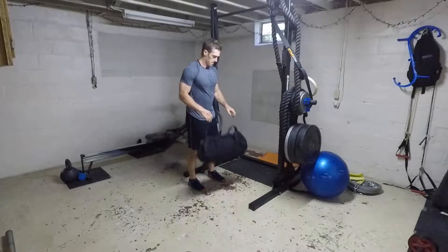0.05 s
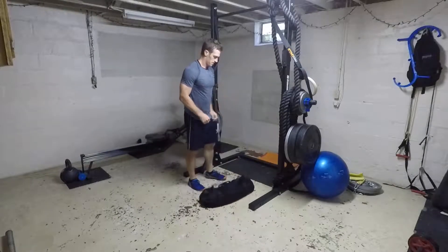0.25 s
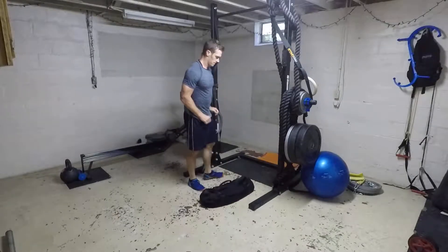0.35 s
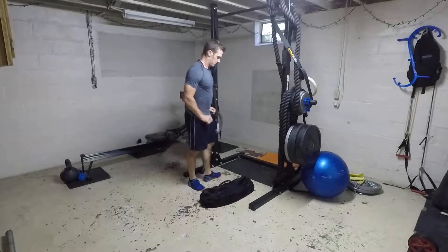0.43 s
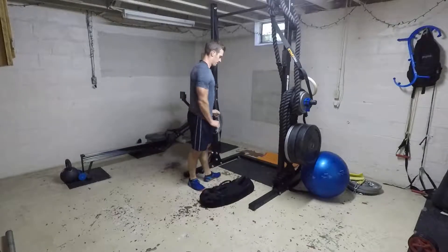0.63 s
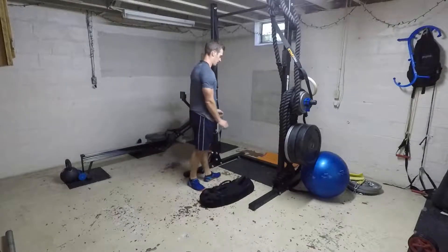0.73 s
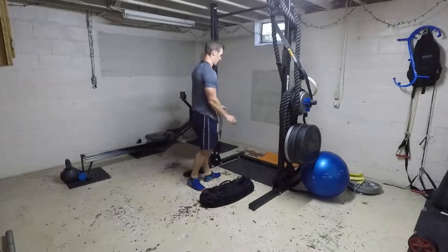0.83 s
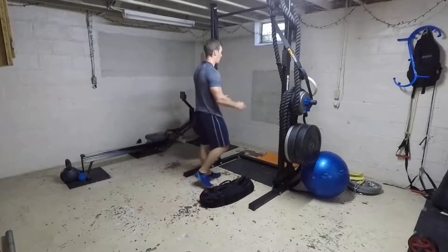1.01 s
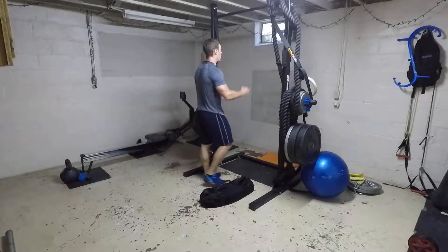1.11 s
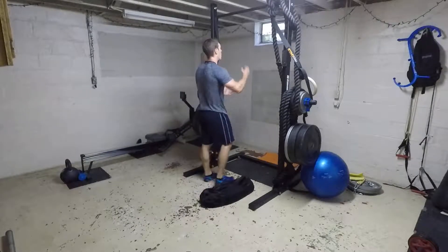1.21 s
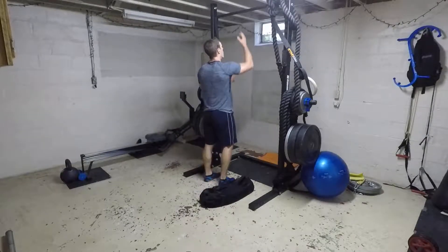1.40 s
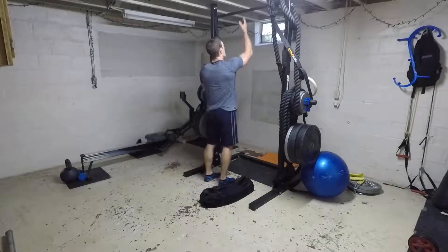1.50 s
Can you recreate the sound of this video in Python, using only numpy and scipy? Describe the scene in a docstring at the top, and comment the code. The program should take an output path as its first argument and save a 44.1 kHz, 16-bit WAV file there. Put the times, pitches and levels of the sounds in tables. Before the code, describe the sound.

A heavy sandbag lands on concrete with a thud and a cloth slap, just after its straps slide off the hands. The small basement booms briefly, sand crunches and buckles ring faintly, then feet shuffle quietly.

```python
"""A heavy thud and slap: a sandbag, slipping from the hands, hits a small basement's concrete floor.
The webbing hisses off the hands; the bulk lands, then the rest flops down more softly.
Each landing pushes out a wave of air and the room's low modes boom.
The cloth smacks flat, buckles ring faintly, sand crunches and trickles.
Then feet shuffle and a sleeve swishes over faint hiss and a soft, regular low pulsing."""
import sys
import numpy as np
from scipy import signal
from scipy.fft import rfft, irfft, next_fast_len
from scipy.io import wavfile
from scipy.ndimage import map_coordinates

SR = 44100
rng = np.random.default_rng(int(sys.argv[2]) if len(sys.argv) > 2 else 0)


def dump(signal):
    """Clip the signal to [-1, 1] and save it as 16-bit WAV at the path in sys.argv[1]."""
    limited = np.clip(np.atleast_2d(signal).T, -1, 1)
    pcm = np.round(limited * 32767).astype(np.int16)
    wavfile.write(sys.argv[1], SR, pcm)


N = 68355
TOUCH_S = 0.2055  # slack cloth meets the floor

# Bag landings, the bulk then the rest. Each row: start in seconds, air push in dB, slap in dB.
LANDINGS = [(0.2100, -2.5, -15), (0.2259, -8, -19)]
# Hiss of sand and sleeve. Each row: frequency in Hz, relative density in dB.
HISS_SPECTRUM = [(1500, -34), (3400, -23), (4300, -10), (5100, -6.5), (5800, 1.5), (6500, -5), (7400, -10),
                 (9200, -15), (11000, -30.5), (13000, -27), (15500, -41)]
# Rumble of body and feet. Each row: frequency in Hz, relative density in dB.
RUMBLE_SPECTRUM = [(25, -6), (70, 0), (120, -4), (200, -5), (235, -11), (285, -24), (400, -34), (800, -60),
                   (2000, -110)]


def amp(db):
    """dB to gain."""
    return 10 ** (np.asarray(db) / 20)


def unit(x):
    """Scale to rms 1."""
    return x / np.sqrt(np.mean(x ** 2) + 1e-20)


def time_s():
    """Time of each sample."""
    return np.arange(N) / SR


def interp_log_hz(points, hz):
    """Interpolate (Hz, value) points on a log frequency axis."""
    point_hz, values = np.transpose(points)
    return np.interp(np.log(hz + 1), np.log(point_hz + 1), values)


def envelope(points):
    """Gain per sample from (s, dB) points."""
    return amp(np.interp(time_s(), *np.transpose(points)))


def coloured(x, spectrum):
    """Minimum-phase filter with the given spectrum and unit power gain."""
    n_fft = 2 * next_fast_len(N)
    gain = unit(amp(interp_log_hz(spectrum, np.fft.rfftfreq(n_fft, 1 / SR))))
    cepstrum = irfft(np.log(np.maximum(gain, 1e-6)))
    cepstrum[1:n_fft // 2] *= 2
    cepstrum[n_fft // 2 + 1:] = 0
    return irfft(rfft(x, n_fft) * np.exp(rfft(cepstrum)))[:N]


def noise(spectrum):
    """Coloured noise, rms 1."""
    return unit(coloured(rng.standard_normal(N), spectrum))


def grains(per_s):
    """Random tiny impacts, rms 1."""
    return unit(rng.standard_normal(N) * (rng.random(N) < per_s / SR))


def burst(start_s, rise_s, t60_s):
    """Envelope with exponential rise and decay."""
    age_s = np.maximum(time_s() - start_s, 0)
    return (1 - np.exp(-age_s / rise_s)) * amp(-60 * age_s / t60_s)


def ring(modes, start_s, rise_s, drift_rad):
    """Damped modes with wandering phases."""
    t, out = time_s(), np.zeros(N)
    for hz, db, t60_s in modes:
        wander = map_coordinates(rng.standard_normal(100), [t * 50])
        phase = 2 * np.pi * hz * (t - start_s) + drift_rad * wander
        out += amp(db) * np.sin(phase) * burst(start_s, rise_s, t60_s)
    return out


def room(x, wet_db, build_s=0.009):
    """Direct sound plus dense reflections off bare block walls."""
    # Reverb decay. Each row: frequency in Hz, T60 in seconds.
    decay = [(100, 0.52), (450, 0.31), (1000, 0.42), (3000, 0.35), (6000, 0.34), (14000, 0.35)]
    hz, t, bands = signal.stft(rng.standard_normal(SR), SR, nperseg=256)
    t60_s = interp_log_hz(decay, hz)[:, None]
    tail = signal.istft(bands * amp(-60 * t / t60_s), SR, nperseg=256)[1]
    tail *= 1 - np.exp(-np.arange(len(tail)) / SR / build_s)
    return x + amp(wet_db) * signal.fftconvolve(x, tail / np.linalg.norm(tail))[:N]


def background():
    """Faint steady hiss; late on, soft low pulses at about ten a second."""
    # Hiss. Each row: frequency in Hz, relative density in dB.
    floor_spectrum = [(100, -8.5), (250, 4.5), (500, 2), (900, -5), (1500, -3.5), (2200, -8.5), (3300, -19),
                      (5000, -15.5), (7500, -20.5), (9800, -18.5), (12000, -26.5), (15000, -32)]
    # Low pulses. Each row: time in seconds, gain in dB.
    pulses = [(0.9747, -29.5), (1.08, -35), (1.18, -27.5), (1.2833, -25.5), (1.385, -26.5), (1.489, -26)]
    width_s = 0.0026
    out = amp(-52) * noise(floor_spectrum)
    for at_s, db in pulses:
        widths = (time_s() - at_s) / width_s
        crest = np.exp(-(widths + 0.5) ** 2)
        trough = 0.78 * np.exp(-((widths - 2.3) / 2.34) ** 2)
        out += amp(db) * (crest - trough)
    return out


def movement():
    """After the drop feet tread and shuffle, a sole scuffs, a sleeve swishes."""
    # Foot envelopes. Each row: time in seconds, level in dB.
    tread_levels = [(.4, -35), (.55, -44), (.75, -43.5), (.9, -36.5), (1.05, -35), (1.17, -37.5),
                    (1.35, -43), (1.55, -46.5)]
    shuffle_levels = [(.35, -42), (.5, -48), (.7, -44.5), (.9, -47.5), (1.02, -62), (1.15, -80)]
    # Soles on concrete. Each row: frequency in Hz, relative density in dB.
    shuffle_spectrum = [(80, -13), (160, -1), (320, 0), (600, -8), (1000, -13), (2000, -26), (3500, -48),
                        (8000, -63)]
    scuff_spectrum = [(80, -23), (200, -12), (550, 6.5), (900, -4), (1400, -1.5), (2200, -14), (3500, -31),
                      (8000, -67)]
    tread = envelope(tread_levels) * noise(RUMBLE_SPECTRUM)
    shuffle = envelope(shuffle_levels) * noise(shuffle_spectrum)
    fade_in = np.clip((time_s() - TOUCH_S) / 0.14, 0, 1)
    scuff = amp(-41.5) * burst(start_s=1.268, rise_s=0.011, t60_s=0.31) * noise(scuff_spectrum)
    sleeve = amp(-45.5) * burst(start_s=1.486, rise_s=0.011, t60_s=0.3) * noise(HISS_SPECTRUM)
    return fade_in * (tread + shuffle) + scuff + sleeve


def straps():
    """Ribbed webbing slides off the hands over a low body rumble; both die away on touchdown."""
    # Webbing's broad hiss and narrow zip. Each row: frequency in Hz, relative density in dB.
    slide_spectrum = [(100, -14), (190, -1), (300, -9), (450, -6), (750, -19), (1500, -23), (2400, -23),
                      (3600, -29), (4800, -19), (5800, -16), (7000, -22), (10000, -39), (14000, -58),
                      (16000, -80)]
    zip_spectrum = [(4000, -70), (5400, -15), (5590, 0), (5780, -15), (7200, -70)]
    # Body rumble. Each row: time in seconds, level in dB.
    rumble_levels = [(0, -25.5), (.11, -36.5), (.19, -30)]
    slide_t60_s, landed_db_per_s = 1.1, -150
    t = time_s()
    slide = amp(-35.5) * noise(slide_spectrum) + amp(-43.5) * noise(zip_spectrum)
    slide *= amp(-60 * t / slide_t60_s)
    rumble = envelope(rumble_levels) * noise(RUMBLE_SPECTRUM)
    return (slide + rumble) * amp(landed_db_per_s * np.maximum(t - TOUCH_S, 0))


def sand():
    """The filling hisses just before the blow, crunches as it stops, then trickles into place."""
    # Settling grains. Each row: frequency in Hz, relative density in dB.
    trickle_spectrum = [(2000, -28), (3600, -41), (5000, -5), (6100, 1), (7500, -7.5), (10500, -11),
                        (12000, -18), (15000, -26)]
    lead_in_s = 0.0083
    lead_in = amp(-37) * np.exp(-np.abs(time_s() - TOUCH_S) / lead_in_s)
    blow = amp(-20.5) * burst(TOUCH_S, rise_s=0.0065, t60_s=0.24)
    crunch = (lead_in + blow) * grains(per_s=11000)
    trickle = amp(-54) * burst(TOUCH_S, rise_s=0.1, t60_s=2.48) * grains(per_s=4000)
    return room(coloured(crunch, HISS_SPECTRUM) + coloured(trickle, trickle_spectrum), wet_db=2.5)


def slap():
    """Cloth touches down and smacks flat on the concrete; the strap buckles ring."""
    # Cloth contact and dry first smack. Each row: frequency in Hz, relative density in dB.
    slap_spectrum = [(40, -19), (100, 1), (200, 3), (400, 3), (560, -3), (660, -10.5), (850, -13),
                     (1100, -11.5), (1650, -14.5), (2050, -11.5), (2500, -23.5), (3400, -29), (6000, -54),
                     (11000, -49), (15000, -64)]
    smack_spectrum = [(60, -10), (200, 2), (420, 2), (680, -13), (1300, -10.5), (1700, -14), (2000, -1),
                      (2400, -11.5), (3300, -24), (4500, -19.5), (6000, -11.5), (7500, -29), (11000, -49),
                      (15000, -37)]
    # Buckle modes. Each row: frequency in Hz, relative level in dB, T60 in seconds.
    buckle_modes = [(1050, -9, .25), (2010, -2, .18), (2072, -2, .2), (5685, -1, .3), (6010, 0, .38),
                    (6440, -2, .28), (9400, -12, .5)]
    first_s = LANDINGS[0][0]
    contact = amp(-20.5) * burst(TOUCH_S, rise_s=0.00078, t60_s=0.024)
    for start_s, _, slap_db in LANDINGS:
        contact += amp(slap_db) * burst(start_s, rise_s=0.0007, t60_s=0.083)
    smack = amp(-13) * burst(first_s - 0.002, rise_s=0.0012, t60_s=0.1) * noise(smack_spectrum)
    buckles = amp(-32) * ring(buckle_modes, first_s, rise_s=0.003, drift_rad=1.0)
    cloth = coloured(contact * grains(per_s=12000), slap_spectrum)
    return room(cloth, wet_db=6.5) + smack + buckles


def thud():
    """Each landing pushes out one short wave of air; the blow rings the room's low modes."""
    # Room modes. Each row: frequency in Hz, relative level in dB, T60 in seconds.
    room_modes = [(66.94, -1.5, 0.65), (83, 3, .36), (112.6, -0.5, 0.31), (157.9, -0.5, .42),
                  (191.8, 3, 0.324), (248.2, 7.5, 0.16), (283.3, -9, 0.21), (310, -8, 0.23),
                  (391, -5, 0.24), (469, -2.5, 0.274), (537, -8.5, .17)]
    push_hz, push_sigma_s = 115, 0.0034
    out = amp(-13.5) * ring(room_modes, TOUCH_S, rise_s=0.007, drift_rad=0.48)
    for start_s, push_db, _ in LANDINGS:
        t = time_s() - start_s - push_sigma_s
        window = np.exp(-(t / push_sigma_s) ** 2 / 2)
        out += amp(push_db) * np.sin(2 * np.pi * push_hz * t) * window
    return out


def scene():
    """Mono sum of all sources."""
    return (thud() + slap() + sand() + straps() + movement() + background())[None]


def record(dry):
    """Soft clip, then brick-wall low-pass."""
    ceiling, cutoff_hz = 0.95, 15250
    clipped = dry / (1 + np.abs(dry / ceiling) ** 6) ** (1 / 6)
    n_fft = 2 * next_fast_len(N)
    passband = np.fft.rfftfreq(n_fft, 1 / SR) < cutoff_hz
    return irfft(rfft(clipped, n_fft) * passband, n_fft)[..., :N]


dry = scene()
out = record(dry)
dump(out)
```